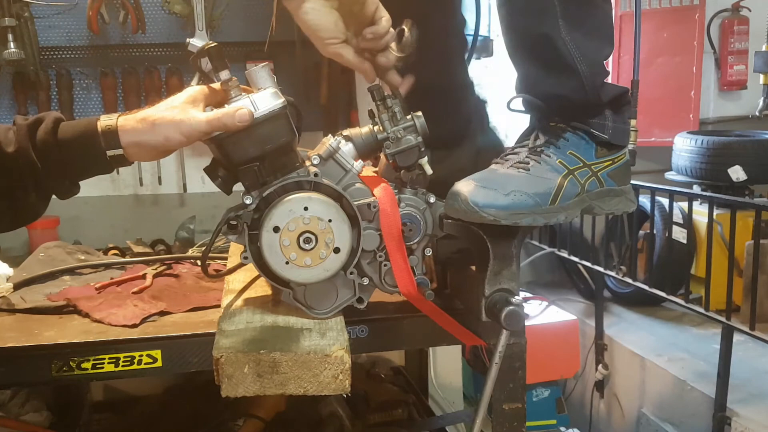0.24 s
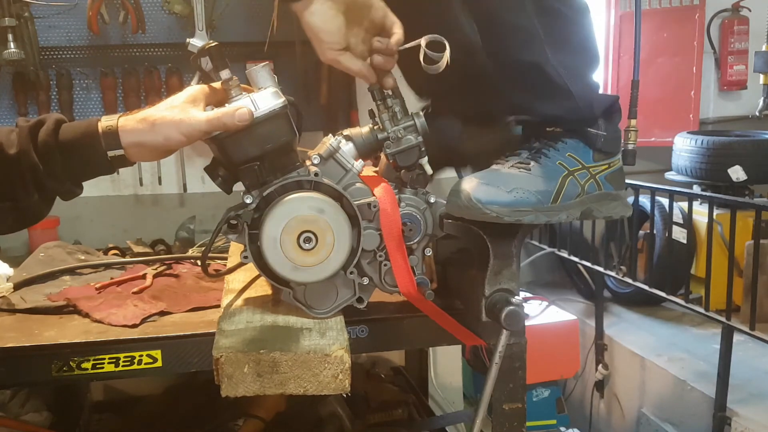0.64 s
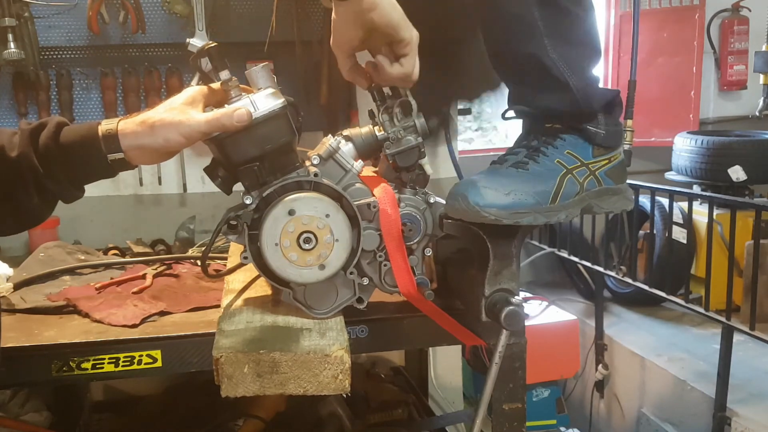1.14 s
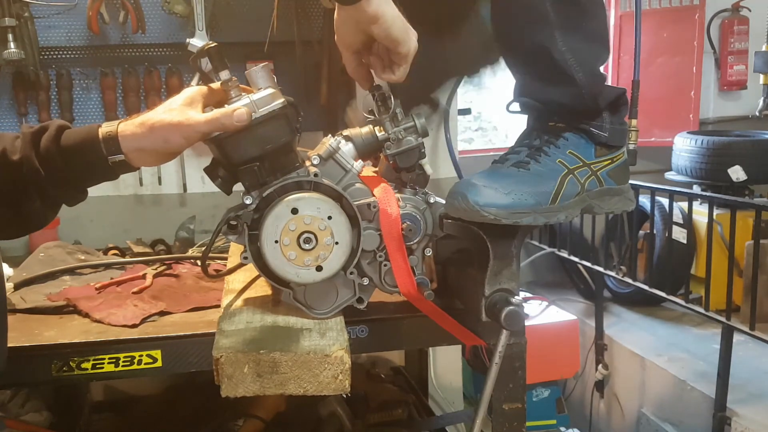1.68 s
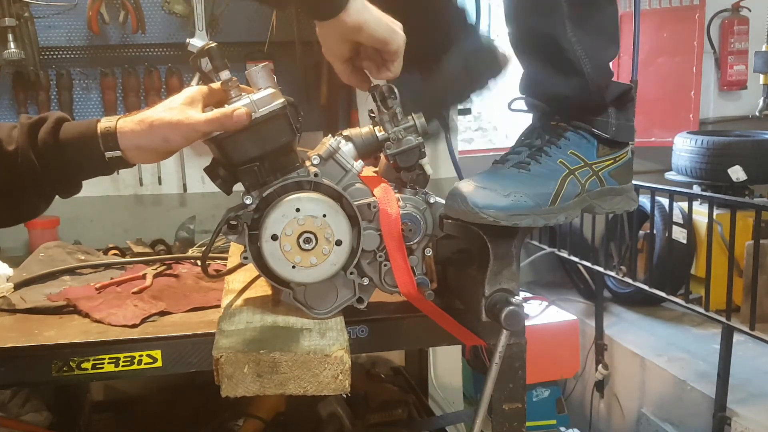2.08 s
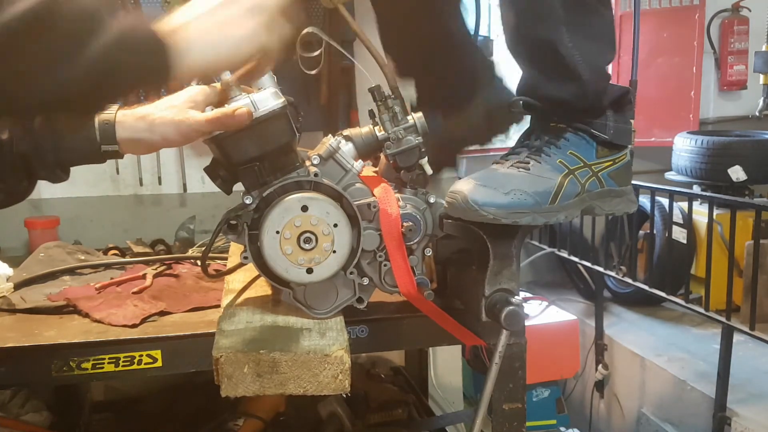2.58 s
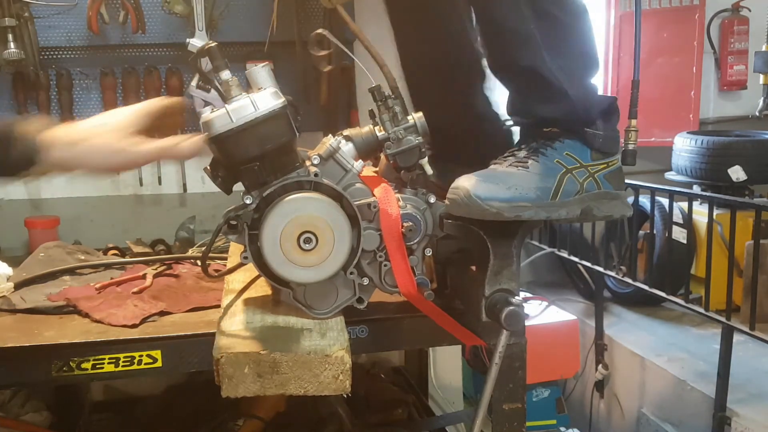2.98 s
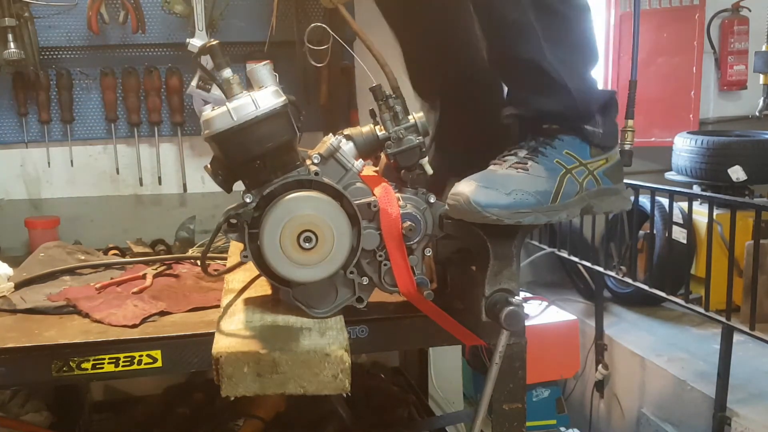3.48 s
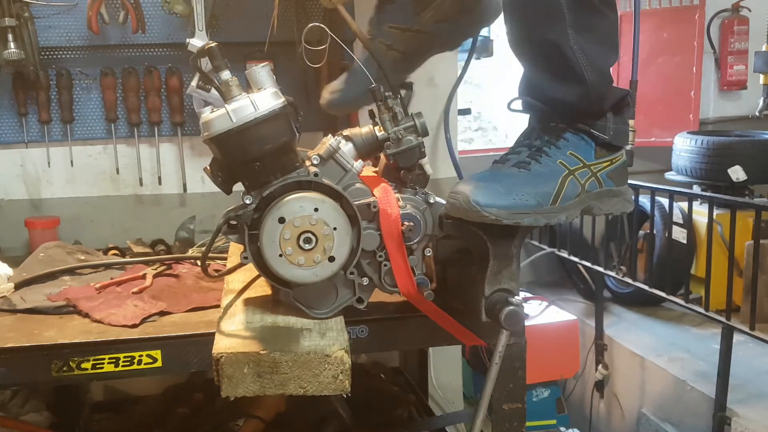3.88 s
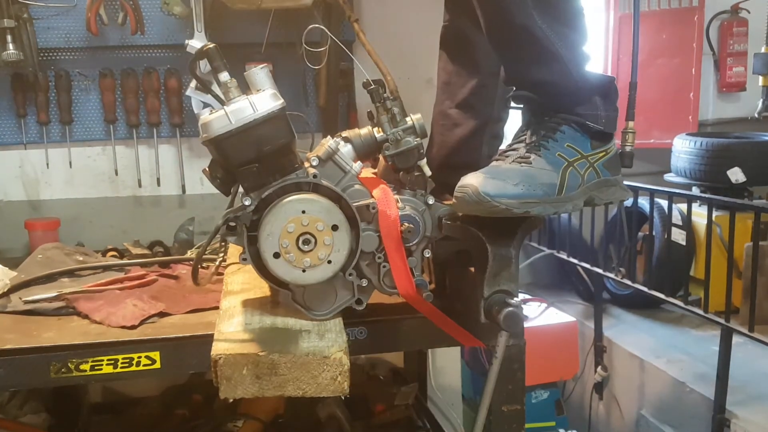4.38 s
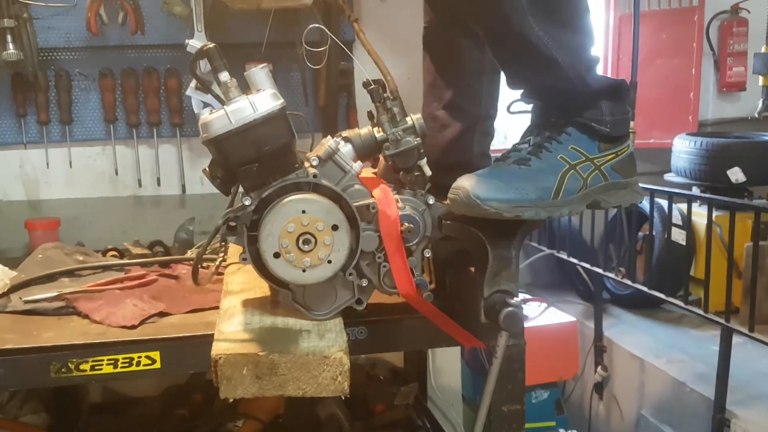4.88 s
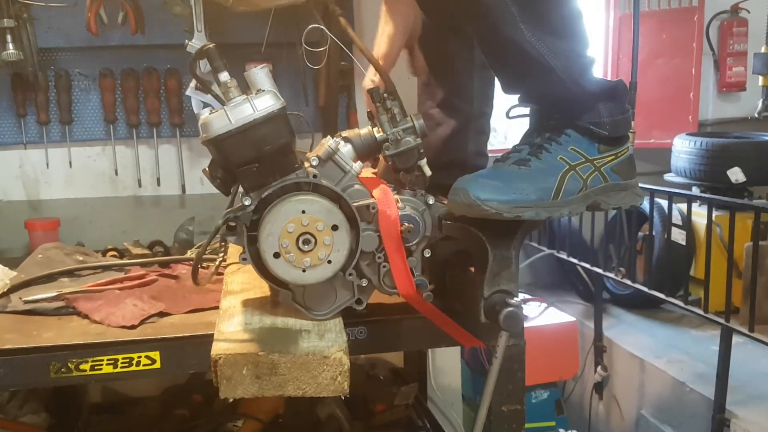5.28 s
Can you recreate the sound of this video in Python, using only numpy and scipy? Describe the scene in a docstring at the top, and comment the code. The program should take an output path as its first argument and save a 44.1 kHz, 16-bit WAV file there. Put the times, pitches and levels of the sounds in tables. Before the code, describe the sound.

A small two-stroke engine on a bench is kicked over nine times, ratchet clanking, open port puffing, most kicks banging, then sudden quiet.

```python
"""A ratchet snaps as a small two-stroke engine is kicked over, again and again, on a workshop bench.
Gears rattle (noise and knocks), metal parts chirp (sliding tones), and the open port, without an exhaust
pipe, puffs once per turn of the slowing crank (ringing tones and hiss). Most kicks end in a sharp bang
(spike and noise) and the hard room rings. The sound of the last kick is cut off abruptly, echo included;
light clinks follow. Table levels set the strength of an event; each layer then adds its own trim."""
import sys
import numpy as np
from scipy import signal
from scipy.fft import rfft, irfft, next_fast_len
from scipy.io import wavfile
from scipy.ndimage import map_coordinates

SR = 44100
rng = np.random.default_rng(int(sys.argv[2]) if len(sys.argv) > 2 else 0)


def wav_record(signal):
    """Record a signal, one row per channel, as 16-bit PCM in the file named by sys.argv[1]."""
    frames = np.transpose(np.atleast_2d(signal))
    bounded = np.clip(frames, -1, 1)
    # unit amplitude maps onto the largest positive 16-bit level
    quanta = np.round(bounded * 32767).astype(np.int16)
    wavfile.write(sys.argv[1], SR, quanta)


N = 244314  # length in samples

# The foot comes down and the ratchet catches. Each row: catch in seconds, level in dB, ring of the case
# in dB relative to it, seconds by which a first tooth grazes earlier, level of that graze in dB.
KICKS = [(0.0004, -19.5, 9.5, 0.032, -15), (0.642, -20.5, 10, 0.035, -26.5),
         (1.2029, -14, 5.5, 0.027, -27.5), (1.7662, -17, 4, 0.023, -24), (2.3417, -17, 5, 0.039, -22.5),
         (2.9159, -10.5, 3, .026, -15), (3.468, -18, 2.5, .017, -27), (4.0361, -13.5, 8, 0.027, -23),
         (4.593, -11.5, 4.5, 0.019, -14.5)]
GRAZE_RING_DB = -2  # case ring of the grazing tooth, relative to its level


def catches():
    """Every kick grazes one tooth, then catches the next: rows (seconds, level dB, ring dB)."""
    grazes = [(s - lead, graze_db, GRAZE_RING_DB) for s, db, ring_db, lead, graze_db in KICKS]
    return grazes + [(s, db, ring_db) for s, db, ring_db, lead, graze_db in KICKS]


# The lever settles against the ratchet. Each row: start in seconds, level in dB, case ring relative to it in dB.
SETTLE = [(5.3987, -27.5, -3)]
# Ringing notes of the crankcase. Each row: pitch in Hz, level in dB, time to fade by 60 dB in seconds.
CASE = [(197.4, -12, 0.16), (474, -16, 0.085), (706, -11, 0.18), (1113, -30, 0.01), (1700, -12.5, 0.014),
        (2100, -22, 0.056)]
# Tone colour of metal teeth, also of the clatter after a bang. Each row: frequency in Hz, relative level in dB.
CATCH_COLOUR = [(150, -6.5), (700, -1), (1700, 0.5), (2600, -5.5), (4000, -11), (6000, -17.5), (9000, -24),
                (15500, -32)]


def ratchet(rows):
    """The teeth scrape, then snap together; the clank sweeps down into the crankcase's main note."""
    lead = .02  # seconds of scraping before the snap
    t = age() - lead
    scrape = amp(-13.0) * np.exp(np.minimum(t, 0) / 0.0092) * (t < 0)
    after = np.maximum(t, 0)
    snap = (1 - np.exp(-after / 0.00056)) * np.exp(-after / 0.0064)
    teeth = place((s - lead, amp(db - 3.0) * (scrape + snap) * rng.standard_normal(len(t)))
                  for s, db, ring_db in rows)
    # bending waves in the metal carry the high notes out first
    sweep = place((s, amp(db - 1.5) * glide(hz=824, start_hz=2227, settle=0.00285, attack=0.00046,
                                            t60=0.014, rough=0.71)) for s, db, ring_db in rows)
    note = place((s, amp(db + ring_db + 0.5) * glide(hz=735, start_hz=1408, settle=0.002234, attack=0.021,
                                                     t60=0.096, rough=0.22)) for s, db, ring_db in rows)
    case = place((s, amp(db + ring_db - 1) * ring(CASE, attack=0.003, scatter_db=1.0, detune=0.028))
                 for s, db, ring_db in rows)
    near = pan(colour(teeth, CATCH_COLOUR) + sweep, left_db=2.5)
    room = amp(18.0) * echo(colour(strike(rows), CATCH_COLOUR), build=0.0052)
    return near + room + workshop(note + case, wet_db=-7, left_db=0.5)


# Bright tone colour of the tooth snap. Each row: frequency in Hz, relative level in dB.
SNAP_COLOUR = [(1000, -13), (3000, -1), (6000, 2), (11000, -6), (15500, -11)]


def snaps(rows):
    """Steel meets steel with a bright, dry snap at each tooth."""
    track = place((s, amp(db - 14) * burst(t60=0.02)) for s, db, ring_db in rows)
    return pan(colour(track, SNAP_COLOUR), left_db=2.5)


# Tone colour of the gears. Each row: frequency in Hz, relative level in dB.
GEAR_COLOUR = [(50, -35), (110, 9.5), (210, 10.5), (350, 9.5), (750, -8.5), (1100, -12.5), (1700, -12.5),
               (2700, -9), (4000, -37), (8000, -48), (15500, -34)]


def gears(rows):
    """After each catch the gears spin up and run down; a harder catch rattles more."""
    run = (1 - np.exp(-age() / 0.013)) * fade(t60=0.48)
    drive = place((s, amp(db - 13.5) * run) for s, db, ring_db in rows)
    whirr = unit(rng.standard_normal(N) * amp(3.0 * wobble(300, N)))
    # teeth knock through their backlash at uneven moments, 170 a second on average
    knocks = unit((rng.random(N) < 170 / SR) * rng.uniform(.3, 1, N))
    rattle = drive * (0.99 * whirr + 0.7 * knocks)
    resonance = 0.016 * glide(hz=750, start_hz=730, settle=0.0023, attack=0.0027, t60=0.045)
    hollow = signal.fftconvolve(rattle, resonance)[:N]
    return workshop(colour(rattle, GEAR_COLOUR) + hollow, wet_db=-7.5, left_db=0.8)


# Each kick spins the crank. Each row: first puff in seconds, level in dB, bark relative to it in dB,
# chirp level in dB, number of further turns, seconds to the next turn, loss per turn in dB.
SPINS = [(0.102, -6.5, -3.5, -31.5, 0, 0, 2), (0.733, -7.5, 0, -16, 0, 0, 0),
         (1.273, -4.5, 2, -6.5, 1, .077, -0.5), (1.900, -6.5, -2.5, -39, 0, 0, 0),
         (2.429, -6, 0.5, -20.5, 1, 0.1, 9), (2.979, -8.5, -11, -7, 1, 0.062, 2),
         (3.534, -7.5, -2, -17, 2, .058, 2.5), (4.096, -4, -3.5, -25.5, 2, 0.06, 3.5),
         (4.631, -21, 6, -27, 1, 0.038, 4)]
SLOWING = 1.62  # each coasting turn lasts this many times the one before
COAST_BARK_DB = -4  # bark of a coasting turn, relative to its boom
SWELL_S, BRISK_S = 0.0069, 0.074  # boom rise if the first puff is BRISK_S after the catch; slower is longer
CHIRP_LEAD_S = .0135  # the chirp starts this long before the port opens
COAST_CHIRP_DB, CHIRP_SAG_DB_PER_S = -1, 204  # the longer a coasting turn takes, the fainter its chirp


def turns():
    """One chirp and one puff per turn of the slowing crank: rows (s, dB) and (s, dB, bark dB, swell s)."""
    chirp_rows, openings = [], []
    for (caught, *_), (s, db, bark_db, chirp_db, further, period, loss_db) in zip(KICKS, SPINS):
        chirp_rows.append((s - CHIRP_LEAD_S, chirp_db))
        openings.append((s, db, bark_db, SWELL_S * ((s - caught) / BRISK_S) ** 2))
        for _ in range(round(further)):
            s, db = s + period, db - loss_db
            chirp_rows.append((s - CHIRP_LEAD_S, COAST_CHIRP_DB - CHIRP_SAG_DB_PER_S * period))
            openings.append((s, db, COAST_BARK_DB, SWELL_S))
            period = period * SLOWING
    return chirp_rows, openings


# Ringing notes of cylinder and port. Each row: pitch in Hz, level in dB, time to fade by 60 dB in seconds.
CYLINDER = [(73.9, -11.5, 0.13), (151, -8, 0.17), (211.2, 1.5, 0.14), (251.5, -1.5, 0.13)]
PORT = [(322, -18.5, 0.26), (423.6, -3, 0.061), (518.7, 0.5, 0.056), (688, -8.5, 0.05), (2580, -25.5, 0.11)]
# Tone colour of the escaping gas. Each row: frequency in Hz, relative level in dB.
PUFF_COLOUR = [(25, -37.5), (50, -4), (75, 1.5), (110, 1.5), (210, 7), (340, -1.5), (480, 4), (800, -8.5),
               (1300, -13.5), (2600, -19.5), (3600, -27.5), (12000, -31), (15500, -31.5)]


def puffs(rows):
    """Gas barks and hisses out of the port; the cylinder booms, and the nearest wall prolongs the boom."""
    boom = place((s, amp(db) * np.sqrt(swell / SWELL_S)
                  * ring(CYLINDER, attack=swell, scatter_db=1.5, detune=0.008))
                 for s, db, bark_db, swell in rows)
    bark = place((s, amp(db + bark_db) * ring(PORT, attack=0.0057, scatter_db=2.5, detune=0.014))
                 for s, db, bark_db, swell in rows)
    gas = place((s, amp(db + bark_db - 8.5) * burst(t60=0.057)) for s, db, bark_db, swell in rows)
    hiss = colour(gas, PUFF_COLOUR)
    room = amp(13.0) * echo(colour(strike(rows), PUFF_COLOUR), build=0.011) + amp(-17) * echo(boom)
    return boom + 0.09 * late(boom, seconds=0.01892) + bark + hiss + room


# A sharp bang near the bottom of the kick, most likely the lever hitting its stop.
# Each row: start in seconds, level in dB.
BANGS = [(0.7814, -10.5), (1.297, -7), (2.4695, -7.5), (2.9823, -9.5), (3.5542, -8), (4.124, -6.5)]
# Tone colour of the bang. Each row: frequency in Hz, relative level in dB.
BANG_COLOUR = [(30, -20), (90, 2), (210, 6.5), (400, 0.5), (750, -2), (1150, -5), (1750, -1), (2300, -7),
               (3600, -6.5), (5700, -17), (8000, -11), (12000, -19), (15500, -27.5)]


def bangs():
    """A spike and a short ragged noise, thrown back by the bench and the room; the jolted engine clatters on."""
    spike = strike(BANGS)
    noise = place((s, amp(db - 2) * burst(t60=0.027)) for s, db in BANGS)
    blow = noise + 4.5 * spike
    blow = blow + .5 * late(blow, seconds=0.0039)  # thrown back by the bench
    shaking = place((s, amp(db - 20) * fade(t60=0.59)) for s, db in BANGS)
    clatter = shaking * unit(rng.standard_normal(N) * amp(6.6 * wobble(250, N)))
    near = colour(blow, BANG_COLOUR) + colour(clatter, CATCH_COLOUR)
    return pan(near, left_db=3.0) + amp(22.0) * echo(colour(spike, BANG_COLOUR), build=0.0031)


CHIRP_HZ = 1680  # average resting pitch
BANG_CHIRP_DB, BANG_CHIRP_S = -7, .004  # a bang sets off a similar note, at this level, just after it


def chirps(chirp_rows):
    """Brief metallic chirps just before each puff and after each bang: tones that slide down to rest."""
    rows = chirp_rows + [(s + BANG_CHIRP_S, db + BANG_CHIRP_DB) for s, db in BANGS]
    pitches = CHIRP_HZ * (1 + 0.024 * rng.standard_normal(len(rows)))
    track = place((s, amp(db + 2.0) * glide(hz, hz * 1.14, settle=0.0018, attack=0.0016, t60=0.021, rough=0.69))
                  for (s, db), hz in zip(rows, pitches))
    return workshop(track, wet_db=-13.5, left_db=6.0)


# Thin metal parts on the engine. Each row: pitch in Hz, level in dB, time to fade by 60 dB in seconds
# (extra damping below shortens it).
FITTINGS = [(1770, -1, 0.15), (2570, -2, .4), (3480, -5, 0.27), (3710, -6, 0.32), (4400, -4.5, .35),
            (5200, -7, .25), (7040, -9, .18), (8450, -8.5, .25), (9400, -12, .2), (11500, -15.5, .15)]


def fittings():
    """Each bang sets the thin metal parts ringing; they waver as the engine shakes."""
    damping = fade(t60=.9)
    track = place((s, amp(db - 25) * damping * ring(FITTINGS, attack=0.002, scatter_db=2.5, detune=0.003))
                  for s, db in BANGS)
    return workshop(track * amp(2.5 * wobble(120, N)), wet_db=-2, left_db=3.5)


def grit():
    """After a bang, loose parts knock at uneven moments until the shaking dies."""
    shaking = place((s, amp(db - 10) * fade(t60=.6)) for s, db in BANGS)
    knocks = (rng.random(N) < 130 / SR) * rng.uniform(-1, 1, N)  # 130 a second on average
    rattle = signal.fftconvolve(shaking * knocks, burst(t60=0.006))[:N]
    spectrum = [(300, -15), (1000, -3), (2500, 0), (5000, -6), (8000, -6), (15500, -22)]
    return pan(colour(rattle, spectrum), left_db=2.5)


# Loose parts tick as the lever comes back. Each row: start in seconds, level in dB, room relative to it in dB.
TICKS = [(0.172, -30, 16.5), (0.3605, -27, 11.5), (0.939, -24.5, 12.5), (1.081, -26, 7),
         (1.998, -32.5, 17.5), (2.174, -25, 6.5), (2.651, -23, 11.5)]
# Ringing notes of those parts. Each row: pitch in Hz, level in dB, time to fade by 60 dB in seconds.
LOOSE = [(2030, -1.5, 0.025), (2890, 0, .035), (3600, -5.5, .03), (4520, -6, .025)]
# Tone colour of the contact. Each row: frequency in Hz, relative level in dB.
TICK_COLOUR = [(300, -20.5), (1500, 0.5), (2900, 3.5), (4500, -9), (8000, -17.5), (11000, -16),
               (15500, -26)]


def ticks():
    """Dry little contacts close to the microphone, each with a brief ring."""
    track = place((s, amp(db - 3.5) * burst(t60=0.014)) for s, db, room_db in TICKS)
    knock = place((s, amp(db - 9) * ring(LOOSE, attack=0.0003, scatter_db=2.0, detune=0.03))
                  for s, db, room_db in TICKS)
    sent = strike([(s, db + room_db) for s, db, room_db in TICKS])
    near = pan(colour(track, TICK_COLOUR) + knock, left_db=1.5)
    return near + echo(colour(sent, TICK_COLOUR), build=.004)


# A small steel part clinks. Each row: start in seconds, level in dB, frequency in Hz above which
# the tap is too soft to ring it.
CLINKS = [(5.217, -33.5, 3800), (5.271, -32, 9000)]
# Ringing notes of the steel. Each row: pitch in Hz, level in dB, time to fade by 60 dB in seconds.
STEEL = [(1520, -3, 0.019), (2283, -13, 0.092), (3960, -9, 0.31), (4070, -10.5, 0.22), (4220, -5.5, 0.05),
         (5400, -10.5, 0.13), (7180, -20, 0.06), (8021, -7.5, 0.097)]


def clinks():
    """Light steel rings on after a tiny tap; a harder tap reaches its higher notes."""
    def reached(edge_hz):
        return [(hz, db - 10 * np.log10(1 + (hz / edge_hz) ** 4), t60) for hz, db, t60 in STEEL]

    steel = place((s, amp(db - 8) * ring(reached(edge_hz), attack=0.00013, scatter_db=2, detune=0.002))
                  for s, db, edge_hz in CLINKS)
    tap = place((s, amp(db - 8.5) * burst(t60=0.032)) for s, db, edge_hz in CLINKS)
    tap = colour(tap, [(500, -1.0), (1600, -4), (4200, -0.5), (8000, -9.0), (15500, -22.5)])
    wavering = steel * amp(2.5 * wobble(90, N))
    return workshop(wavering, wet_db=-2.5, left_db=6.0) + workshop(tap, wet_db=-1, left_db=6.0)


# The shoe bumps the engine softly. Each row: start in seconds, level in dB.
BUMPS = [(5.166, -39), (5.482, -39.5)]


def bumps():
    """A soft push makes the cylinder boom faintly."""
    boom = place((s, amp(db - 2) * ring(CYLINDER, attack=0.003, scatter_db=2.0, detune=0.03)) for s, db in BUMPS)
    spectrum = [(50, -24.5), (120, -7), (220, 1), (400, -7.5), (1000, -17), (3000, -28), (15500, -51)]
    thud = colour(strike(BUMPS), spectrum)
    return workshop(boom, wet_db=-10, left_db=-1.7) + amp(22) * echo(thud, build=0.0058)


# Shoe and sleeve rub on the engine. Each row: middle in seconds, half length in seconds, level in dB.
RUBS = [(2.192, 0.054, -46.5), (4.944, 0.042, -64.5), (5.085, 0.018, -69.5), (5.309, 0.013, -58),
        (5.377, 0.0098, -48), (5.484, 0.029, -51)]
# Tone colour of the rubbing. Each row: frequency in Hz, relative level in dB.
RUB_COLOUR = [(60, -5.5), (220, 0.5), (500, 2), (1000, 4.5), (2200, -8.5), (4000, -15.5), (15500, -49.5)]


def rubs():
    """Soft scuffs that swell and fade, rough with stick and slip."""
    t = np.arange(N) / SR
    pressure = sum(amp(db) * np.exp(-np.minimum(((t - s) / half) ** 2, 20)) for s, half, db in RUBS)
    friction = unit(rng.standard_normal(N) * amp(2.8 * wobble(220, N)))
    return workshop(colour(pressure * friction, RUB_COLOUR), wet_db=-3, left_db=1.5)


# Tone colour of the quiet room. Each row: frequency in Hz, relative level in dB.
HUSH = [(30, -20.5), (70, -14), (130, -13), (220, -5), (500, -9), (1000, -13), (2400, -19.5), (5000, -30.5),
        (9500, -37.5), (15500, -27.5)]


def hush():
    """The quiet air of the room: steady, wide noise."""
    air = signal.istft(diffuse(N + SR)[2], SR)[1][:, :N]
    return amp(-61.5) * unit(colour(air, HUSH))


# How long the workshop rings. Each row: frequency in Hz, time to fade by 60 dB in seconds.
WALLS = [(100, 0.89), (260, 0.75), (700, 0.73), (1800, 0.79), (4800, 0.68), (8000, 0.49), (14000, 0.26)]


def echo(x, build=0.017):
    """The workshop's stereo tail, whose treble dies first; it builds up over about build seconds."""
    hz, t, field = diffuse(SR)
    decay = np.exp(-np.log(1000) * t / along(WALLS, hz)[:, None])
    tail = signal.istft(field * decay, SR)[1]
    tail *= 1 - np.exp(-(np.arange(tail.shape[1]) / SR / build) ** 2)
    return signal.fftconvolve(x[None], tail / np.linalg.norm(tail[0]), axes=1)[:, :N]


# Likeness of left and right. Each row: frequency in Hz, likeness (1 is identical, 0 is unrelated).
ALIKE = [(120, 1), (300, 0.96), (600, 0.59), (1200, -0.093), (8000, -0.014)]


def diffuse(size):
    """Short-time spectra of a sound field that is alike on both sides only in the bass."""
    hz, t, (a, b) = signal.stft(rng.standard_normal((2, size)), SR, nperseg=512)
    turn = np.arccos(np.clip(along(ALIKE, hz), -1, 1))[:, None] / 2
    shared, differing = np.cos(turn) * a, np.sin(turn) * b
    return hz, t, np.array([shared + differing, shared - differing])


def workshop(x, wet_db, left_db):
    """The direct sound plus the room's answer."""
    return pan(x, left_db) + amp(wet_db) * echo(x)


def pan(x, left_db):
    """A mono sound, louder on the left by left_db."""
    return x * amp([[left_db / 2], [-left_db / 2]])


def late(x, seconds):
    """The same sound, arriving later."""
    return np.interp(np.arange(N) - round(seconds * SR), np.arange(N), x, left=0)


def ring(modes, attack, scatter_db, detune):
    """Several notes ring out together, each a little different in level and pitch at every blow."""
    t, total = age(), 0
    chance = rng.standard_normal((len(modes), 2))
    for (hz, db, t60), (a, b) in zip(modes, chance):
        tone = np.sin(2 * np.pi * hz * (1 + detune * b) * t)
        total = total + amp(db + scatter_db * a) * fade(t60) * tone
    return total * (1 - np.exp(-t / attack))


def glide(hz, start_hz, settle, attack, t60, rough=0):
    """A tone that slides from its starting pitch to rest while it dies; rough shakes its phase."""
    t = age()
    pitch = hz + (start_hz - hz) * np.exp(-t / settle)
    phase = 2 * np.pi * np.cumsum(pitch) / SR + rough * wobble(200, len(t))
    return np.sin(phase) * (1 - np.exp(-t / attack)) * fade(t60)


def burst(t60):
    """Noise that starts at once and dies."""
    return rng.standard_normal(SR // 2) * fade(t60)


def strike(rows):
    """One impulse for each (seconds, dB) row."""
    return place((s, np.atleast_1d(amp(db))) for s, db, *_ in rows)


def place(events):
    """Sum (seconds, sound) pairs into one track."""
    track = np.zeros(N + 2 * SR)  # a spare second at each end
    for s, sound in events:
        track[SR + round(s * SR):][:len(sound)] += sound
    return track[SR:SR + N]


def colour(x, spectrum):
    """Filter with the given spectrum, never sounding ahead of its input; white noise keeps its power."""
    size = 2 * next_fast_len(N // 2 + SR // 8)
    gain = unit(amp(along(spectrum, np.fft.rfftfreq(size, 1 / SR))))
    # folding the cepstrum forward in time gives the minimum-phase filter
    cepstrum = irfft(np.log(np.maximum(gain, 1e-6)))
    cepstrum[1:size // 2] *= 2
    cepstrum[size // 2 + 1:] = 0
    return irfft(rfft(x, size) * np.exp(rfft(cepstrum)), size)[..., :N]


def wobble(rate, size):
    """A random curve of size samples, straight lines between rate random points a second."""
    knots = rng.standard_normal(int(size * rate / SR) + 4)
    return map_coordinates(knots, [np.arange(size) * rate / SR], order=1)


def age():
    """Seconds since the start of one event, which lasts at most half a second."""
    return np.arange(SR // 2) / SR


def fade(t60):
    """A decay of 60 dB in t60 seconds."""
    return np.exp(-np.log(1000) * age() / t60)


def along(points, hz):
    """Read a curve of (Hz, value) points on a log frequency axis."""
    f, v = np.transpose(points)
    return np.interp(np.log(hz + 1), np.log(f), v)


def amp(db):
    """Decibels to gain."""
    return 10 ** (np.asarray(db) / 20)


def unit(x):
    """Scale to an rms level of 1."""
    return x / np.sqrt(np.mean(x ** 2) + 1e-20)


CUT_S = 4.661  # the sound of the kicking is cut here, in seconds


def scene():
    """The sound of the last kick is cut off, echo included; then only handling sounds and the hush remain."""
    teeth = catches()
    chirp_rows, openings = turns()
    gate = np.exp(-np.maximum(np.arange(N) / SR - CUT_S, 0) / 0.00296)
    starter = ratchet(teeth) + snaps(teeth) + gears(teeth)
    engine = chirps(chirp_rows) + puffs(openings) + bangs() + fittings() + grit()
    handling = ratchet(SETTLE) + bumps() + ticks() + clinks() + rubs()
    return (starter + engine) * gate + handling + hush()


TOP_HZ = 16000  # nothing is kept from here up


def record(dry):
    """The left side hears sooner and, above the bass, louder; deep bass is cut, peaks round off, top is cut."""
    size = next_fast_len(N + SR // 4)
    hz = np.fft.rfftfreq(size, 1 / SR)
    lead = 1.7 / SR  # seconds by which left comes before right
    sides = amp(np.outer([.5, -.5], along([(60, -2.5), (140, 3.0)], hz)))
    sides = sides * np.exp(1j * np.pi * lead * np.outer([1, -1], hz))
    low_cut = 1 / np.sqrt(1 + (38 / (hz + 1)) ** 4)
    heard = irfft(rfft(dry, size) * sides * low_cut, size)
    rounded = heard / (1 + np.abs(heard / .95) ** 6) ** (1 / 6)
    return irfft(rfft(rounded) * (hz < TOP_HZ), size)[:, :N]


dry = scene()
out = record(dry)
wav_record(out)
```